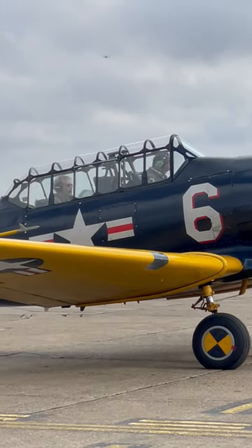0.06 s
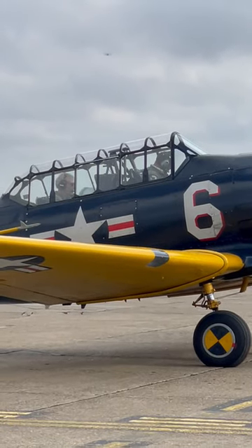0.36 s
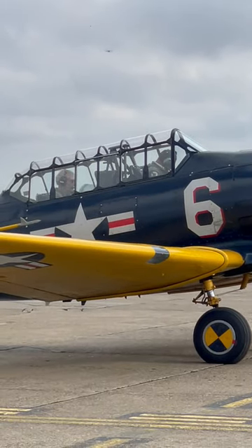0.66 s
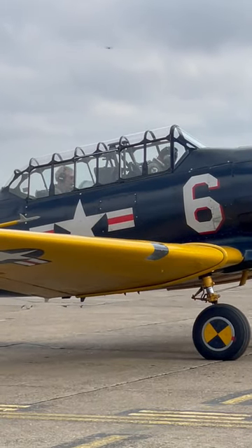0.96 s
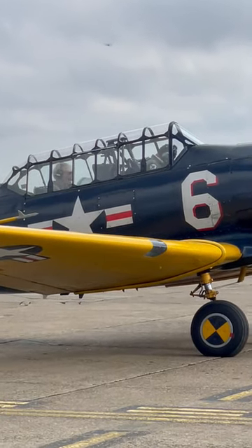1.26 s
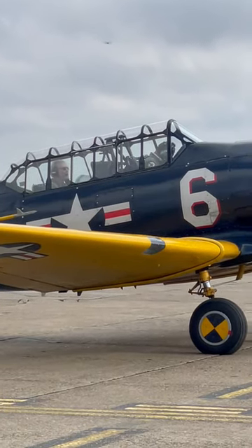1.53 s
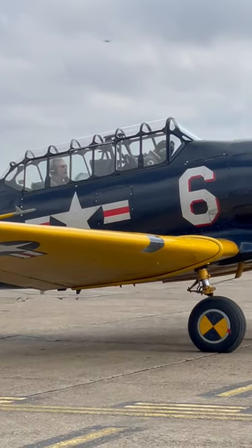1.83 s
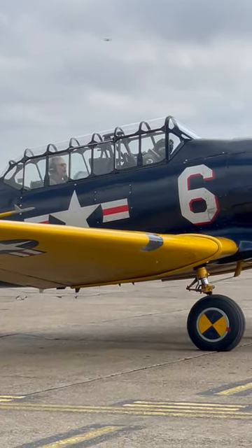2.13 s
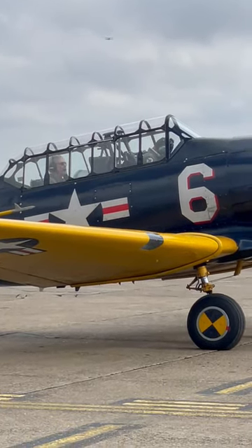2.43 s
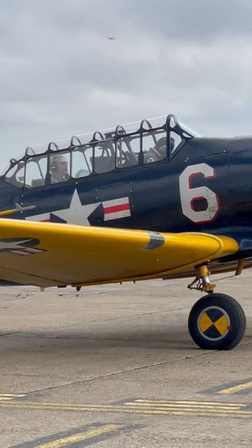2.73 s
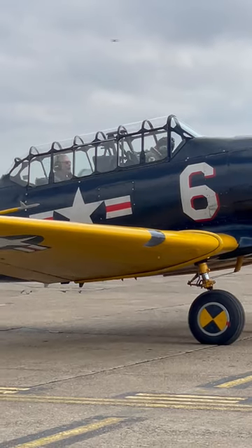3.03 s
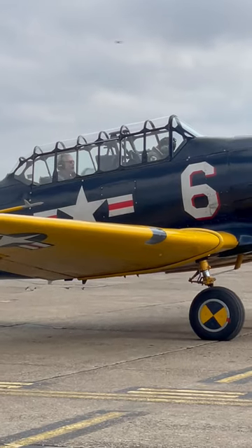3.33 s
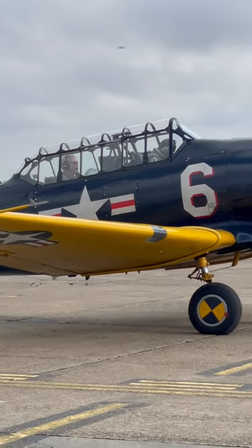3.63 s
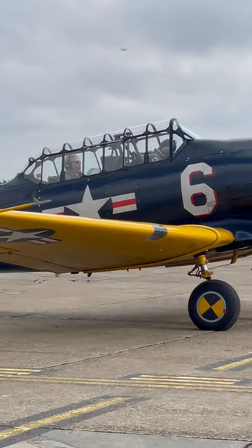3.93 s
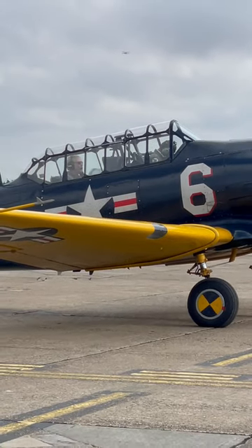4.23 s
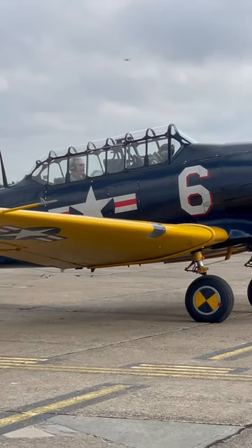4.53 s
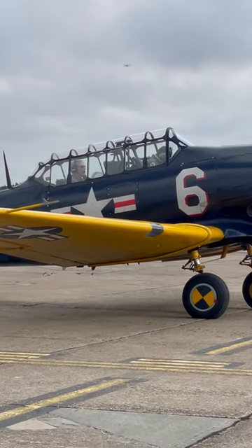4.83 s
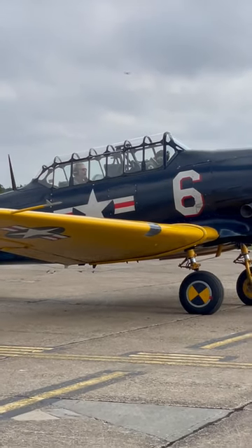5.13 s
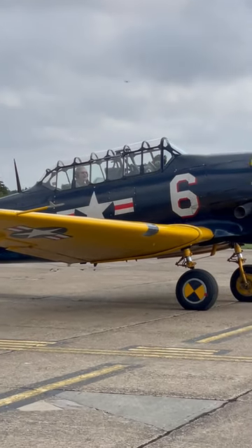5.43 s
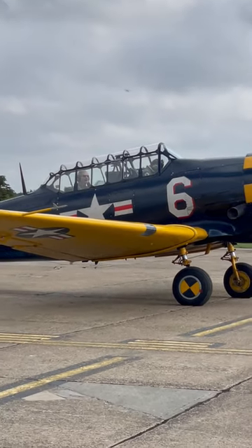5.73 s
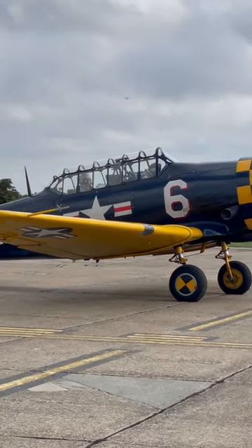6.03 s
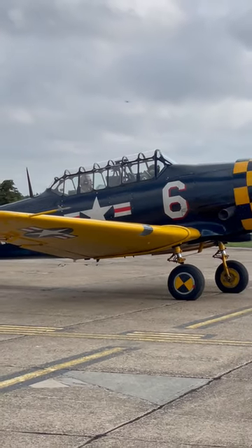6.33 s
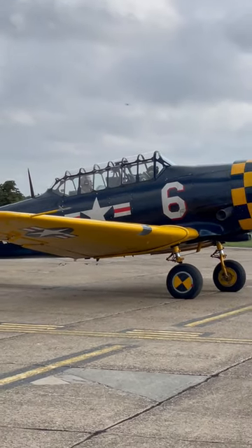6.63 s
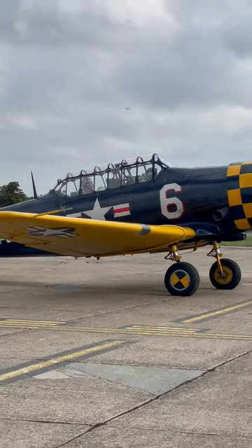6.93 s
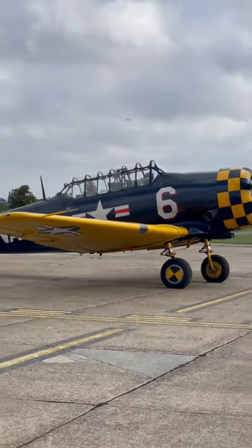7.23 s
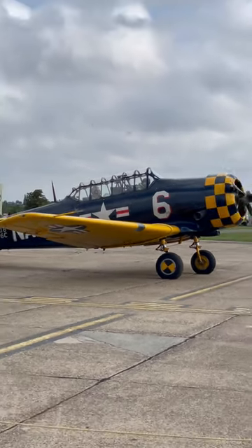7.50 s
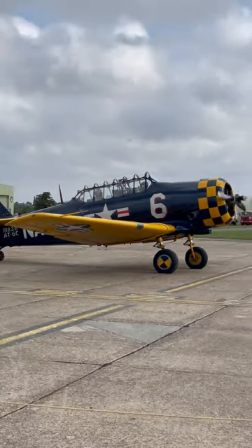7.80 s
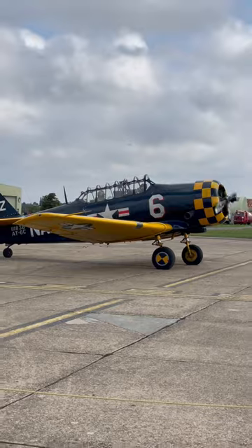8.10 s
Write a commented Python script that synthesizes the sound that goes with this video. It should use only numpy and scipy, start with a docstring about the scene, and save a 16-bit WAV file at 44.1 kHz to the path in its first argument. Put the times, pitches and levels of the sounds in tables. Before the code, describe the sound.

A propeller plane's radial piston engine idles close by on an open concrete apron. A deep, loping exhaust rumble pulses rapidly over a low hum, while the blades chop the air and valves tick and clack. Brief rasps from the propeller and a few hollow pops stand out, and the exhaust coughs around the middle. The sound grows slightly brighter as the microphone moves around the wing.

```python
"""A nine-cylinder radial aero engine idles on a concrete apron as the listener walks round the wing.
From the start, cylinders fire unevenly into one collector over a low hum, the two-blade propeller
chops the air and valves tick and clack; a bounce off the concrete combs blades and ticks.
From 1.4 s gusts rasp in the blades and hollow pops stand out; the exhaust coughs between 3 and 4 s.
The sound opens up until, at 5.5 s, the wing no longer shades it; a last gust and pop follow after 7 s."""
import sys
import numpy as np
from scipy import signal
from scipy.fft import rfft, irfft, next_fast_len
from scipy.io import wavfile
from scipy.ndimage import uniform_filter1d, map_coordinates

SR = 44100
rng = np.random.default_rng(int(sys.argv[2]) if len(sys.argv) > 2 else 0)


def pcm_store(signal):
    """Save signal as 16-bit PCM."""
    levels = np.round(np.clip(np.atleast_2d(signal), -1, 1) * 32767)
    wavfile.write(sys.argv[1], SR, levels.astype(np.int16).T)


N = 359856

# the drifting idle: t/s, firing rate/Hz
IDLE = [(0, 75.18), (.8, 75.33), (1.8, 75.07), (3.4, 75.56), (4.4, 75.28), (5.3, 75.51), (8.16, 75.73)]
# in firing order: exhaust lag/ms, relative pulse/dB, collector echo/ms, echo gain, relative tick/dB
CYLINDERS = [(2.89, 5, 2.54, .58, -5), (1.99, -.7, 3.58, 1, 5), (1.67, -.7, 3.47, .49, 4),
             (1.72, -2.9, 8.02, 1, -14), (.48, 1.9, 3.59, .69, -2), (1.22, 5.2, 3.36, .67, -.5),
             (2.54, 1.3, 3.69, 1, 4), (1.88, .7, 8.65, .81, -3), (.75, 1.2, 3.1, 1, -6)]
# bounce off the concrete: t/s, delay/ms
BOUNCE = [(0, 0.476), (4.1, 0.439), (6, 0.52), (8.16, 0.52)]
# colour of a valve tick: f/Hz, relative level/dB
TICK_COLOUR = [(700, -32), (1800, -33.5), (2600, -5), (4200, 0.5), (6300, -6), (8000, 3), (10500, -9.5),
               (15000, -6.5)]
BARK_DB, BARK_SHADE_DB = -14.5, 1.65  # exhaust bark in full view, and its loss behind the wing


def amp(db):
    """Decibels to gain."""
    return 10 ** (np.asarray(db) / 20)


def unit(x):
    """Scale to rms 1."""
    return x / np.sqrt(np.mean(x ** 2) + 1e-20)


def along(points, hz):
    """Interpolate (f/Hz, value) points on a log axis."""
    f, v = np.transpose(points)
    return np.interp(np.log(hz + 1), np.log(f + 1), v)


def curve(points):
    """Interpolate (t/s, value) points at every sample."""
    return np.interp(np.arange(N) / SR, *np.transpose(points))


def wobble(rate):
    """A smooth random curve, rate knots a second."""
    knots = rng.standard_normal(int(N * rate / SR) + 4)
    return map_coordinates(knots, [np.arange(N) * rate / SR])


def filtered(x, response):
    """Filter x by a complex function of frequency."""
    size = next_fast_len(N + SR // 2)
    return irfft(rfft(x, size) * response(np.fft.rfftfreq(size, 1 / SR)), size)[..., :N]


def coloured(x, spectrum, size=32768):
    """x through a minimum-phase filter with the given spectrum, at rms 1."""
    gain = amp(along(spectrum, np.fft.rfftfreq(size, 1 / SR)))
    cepstrum = irfft(np.log(gain))
    cepstrum[1:size // 2] *= 2
    cepstrum[size // 2 + 1:] = 0
    ring = irfft(np.exp(rfft(cepstrum)))[:size // 2]
    return unit(signal.fftconvolve(np.atleast_2d(x), ring[None], axes=1)[:, :N])


def noise(width):
    """Stereo white noise; width is side against mid."""
    mid, side = rng.standard_normal((2, N))
    return np.array([mid + width * side, mid - width * side])


def pulses(times, sizes):
    """Impulses placed between samples."""
    inside = (times > 0) & (times < (N - 2) / SR)
    at, part = np.divmod(times[inside] * SR, 1)
    at, sizes = at.astype(int), sizes[inside]
    return np.bincount(at, sizes * (1 - part), N) + np.bincount(at + 1, sizes * part, N)


def bursts(times, sizes, rise_ms, fall_ms):
    """An envelope that swells to a peak at each time and dies away."""
    ms = np.arange(-SR // 10, SR // 10) * 1000 / SR
    shape = np.exp(np.where(ms < 0, ms / rise_ms, -ms / fall_ms))
    return signal.fftconvolve(pulses(times, sizes), shape, "same")


def crank_times(slots, start_phase=.474):
    """When the crank reaches the given counts of firings; -1 outside the scene."""
    fired = np.cumsum(curve(IDLE)) / SR + start_phase
    return np.interp(slots, fired, np.arange(N) / SR, left=-1, right=-1)


def firings(count=630):
    """The time of every firing, and the columns of its cylinder."""
    slots = np.arange(count)
    return crank_times(slots), np.array(CYLINDERS)[slots % len(CYLINDERS)].T


def crank_tones(rows, waver_db, drift_rad):
    """Tones locked to the crank, from (periods per engine cycle, level/dB); each wavers on its own."""
    cycles = np.cumsum(curve(IDLE)) / SR / len(CYLINDERS)
    tones = np.zeros(N)
    for order, db in rows:
        gain = amp(db + waver_db * wobble(4.6))
        phase = 2 * np.pi * (round(order) * cycles + rng.random())
        tones += gain * np.sin(phase + drift_rad * wobble(5.1))
    return np.sqrt(2) * tones


def hidden(times, clear_s=5.5):
    """How much of the engine the wing still shades, 0-1."""
    return np.clip(1 - times / clear_s, 0, 1) ** 2


def in_view(level_db, shade_db):
    """Gain that rises by shade_db to level_db as a source comes out from behind the wing."""
    return amp(level_db - shade_db * hidden(np.arange(N) / SR))


def exhaust(scatter_db=.4, jitter_ms=.1, echo_scatter=.06, split_hz=103):
    """Each cylinder blows into the collector; part of the pulse runs round the ring and leaves late."""
    # resonances of the pipe: f/Hz, relative level/dB
    pipe_colour = [(8, -46), (28, -23.2), (45, -33.7), (62, -13.8), (78, .8), (100, -5.8), (122, -14),
                   (150, -.6), (185, -4.4), (225, -16.1), (270, -25.7), (350, -28.5), (460, -65),
                   (2500, -75.6)]
    times, (lag_ms, db, echo_ms, echo_gain, _) = firings()
    force, slip, echo_force, echo_slip = rng.standard_normal((len(times), 4)).T
    sizes = amp(db + scatter_db * force)
    direct = pulses(times + (lag_ms + jitter_ms * slip) / 1000, sizes)
    late_sizes = sizes * echo_gain * (1 + echo_scatter * echo_force)
    late = pulses(times + (lag_ms + echo_ms + jitter_ms * echo_slip) / 1000, late_sizes)
    pipe = coloured(direct + late, pipe_colour)
    # the boom spreads all round, while the bark grows as the outlet comes into view
    boom = filtered(pipe, lambda hz: 1 / (1 + (hz / split_hz) ** 10))
    bark = pipe - boom
    return in_view(-10, shade_db=.45) * unit(boom) + in_view(BARK_DB, BARK_SHADE_DB) * unit(bark)


def growl():
    """A few engine orders set the collector ringing."""
    # ringing orders: periods per engine cycle, level against the bark/dB
    orders = [(35, -28), (39, -22.5), (41, -29), (42, -26), (43, -28), (44, -33), (48, -27.5), (54, -34),
              (55, -36)]
    return in_view(BARK_DB, BARK_SHADE_DB) * crank_tones(orders, waver_db=1.6, drift_rad=.3)


def throbs(half_width_ms=11, count=70, size=6001):
    """Short low throbs at fixed points of each cycle make the engine lope."""
    # the throbs: place in the firing order, f/Hz, level/dB, loss behind the wing/dB
    lope = [(.26, 310, -24, 6), (2.68, 265, -20, 1), (4.16, 350, -25, 10), (4.28, 220, -25, 2),
            (4.66, 285, -21.5, 5), (8.52, 260, -19.5, 2)]
    t = (np.arange(size) - size // 2) / SR
    window = np.exp(-(1000 * t / half_width_ms) ** 2)
    out = np.zeros(N)
    for place, hz, db, shade_db in lope:
        times = crank_times(np.arange(count) * len(CYLINDERS) + place)
        level_db = db + rng.standard_normal(count) - shade_db * hidden(times)
        ring = window * np.cos(2 * np.pi * hz * t)
        out += signal.fftconvolve(pulses(times, amp(level_db)), ring, "same")
    return out


def hum(base_hz=24.45, drift_rad=.045):
    """A low hum wavers slightly and beats against the exhaust."""
    # hum partials: multiple of the base, level/dB
    partials = [(5, -30), (6, -38), (7, -37.5), (9, -38)]
    phase = 2 * np.pi * base_hz * np.arange(N) / SR + drift_rad * wobble(2.4)
    return np.sqrt(2) * sum(amp(db) * np.sin(multiple * phase + 2 * np.pi * rng.random())
                            for multiple, db in partials)


def slipstream(swell_db=1.2):
    """The air behind the propeller rumbles in slow swells."""
    # colour of the rumble: f/Hz, relative level/dB
    rumble_colour = [(8, -19), (40, -6), (100, -7.5), (250, 1), (350, -2.5), (450, -11), (800, -43)]
    swell = amp(swell_db * wobble(5))
    return in_view(-28, shade_db=1.6) * swell * coloured(noise(.24), rumble_colour)


def scattered(x, fall_ms, size=2600):
    """A short flurry of reflections delays the frequencies differently but passes them all alike."""
    ms = np.arange(size) * 1000 / SR
    flurry = rng.standard_normal(size) * np.exp(-ms / fall_ms)
    all_pass = irfft(np.exp(1j * np.angle(rfft(flurry))))
    return signal.fftconvolve(x, all_pass)[:N]


def propeller(offset=.1, wander_s=.00013, slap_width=.14, swish_lag_s=.0017, chop_floor=1.6, count=280):
    """Blades pass four times in nine firings; each slaps the air, drags a swish and rasps in a gust."""
    # colours of the blade's slap, swish and rasp: f/Hz, relative level/dB
    slap_colour = [(10, -54), (40, -29.5), (130, -19.5), (330, -1), (420, 0.5), (500, -5), (640, 2.5),
                   (900, 1), (1500, -11.5), (3000, -37)]
    swish_colour = [(100, -20), (350, 5.5), (650, 5), (1000, 0), (1450, 4), (1950, -5), (2300, -2),
                    (2700, -2.5), (3200, -6), (5000, -14), (9000, -17.5), (15000, -23)]
    rasp_colour = [(200, -17), (550, 10.5), (900, 2.5), (1500, 6), (2000, -2), (2900, -1), (4500, -6.5),
                   (9000, -37.5)]
    times = crank_times(np.arange(count) * len(CYLINDERS) / 4 + offset)
    slip, slap_force, swish_force = rng.standard_normal((count, 3)).T
    # eddies make the slaps wander a little in time and strength
    wander = wander_s * unit(uniform_filter1d(slip, 3))
    blades = pulses(times + wander, amp(1.5 * slap_force))
    # cowling, wing and ground smear each slap, a little differently left and right
    mid = scattered(blades, fall_ms=25.7)
    side = slap_width * np.outer([1, -1], scattered(blades, fall_ms=47))
    slap = coloured(mid + side, slap_colour) * amp(.6 * wobble(18))
    chop = chop_floor + bursts(times + swish_lag_s, amp(2 * swish_force), rise_ms=6.8, fall_ms=4.1)
    swish = coloured(chop * noise(.04), swish_colour) * amp(1.1 * wobble(22))
    rasp = coloured(chop * noise(.1), rasp_colour)
    return in_view(-35, shade_db=5.1) * slap + in_view(-29, shade_db=3.65) * swish + gusts() * rasp


def drone(width=.45):
    """The blades, passing four times a cycle, sing a stack of clean tones."""
    # swells of the drone: t/s, level/dB
    swells = [(0, -48), (1, -47.5), (1.4, -44), (3.5, -43.5), (3.9, -47), (4.45, -42.5), (5, -48),
              (6, -48.5), (7, -44), (7.6, -51.5), (8.16, -50)]
    # its tones: multiple of the blade rate, relative level/dB
    harmonics = [(13, -1), (14, -1), (15, -6), (16, -7), (17, -3), (18, -3), (19, -3), (20, -3), (21, -10),
                 (23, -6), (25, -4)]
    orders = [(4 * multiple, db) for multiple, db in harmonics]
    direct, reflected = (crank_tones(orders, waver_db=2, drift_rad=.65) for _ in range(2))
    return amp(curve(swells)) * (direct + width * np.outer([1, -1], reflected))


def clinks(times, db, hz, rise_ms, fall_ms, size=900):
    """Brief rings of steel, each peaking at its time."""
    offsets = np.arange(size) - size // 3
    t = offsets / SR
    shape = np.exp(np.where(t < 0, t / rise_ms, -t / fall_ms) * 1000)
    phase = 2 * np.pi * (hz[:, None] * t + rng.random((len(times), 1)))
    rings = amp(db)[:, None] * shape * np.sin(phase)
    at = np.round(times * SR).astype(int)[:, None] + offsets
    inside = (at >= 0) & (at < N)
    return np.bincount(at[inside], rings[inside], N)


def valves(scatter_db=2.5, jitter_ms=.66, ring_scatter_db=2, detune=.04):
    """Each valve ticks once a cycle and rings its gear, over the hiss of gas and cooling air."""
    # modes of the valve gear: f/Hz, relative level/dB
    rocker_modes = [(2600, -5), (4200, 2), (5950, 4.5), (6450, 0), (7750, -1)]
    # colour of the hiss: f/Hz, relative level/dB
    hiss_colour = [(800, -21), (3000, 7), (4200, 7), (6000, 5.5), (8000, 3), (11000, -16), (15500, 2.5)]
    times, (*_, tick_db) = firings()
    slip, force = rng.standard_normal((len(times), 2)).T
    times = times + jitter_ms * slip / 1000
    tick_db = tick_db + scatter_db * force
    taps = bursts(times, amp(tick_db), rise_ms=1.7, fall_ms=2.6)
    ticks = coloured(taps * noise(.15), TICK_COLOUR)
    ring = np.zeros(N)
    for hz, db in rocker_modes:
        # no two blows ring the gear alike
        strength, pitch = rng.standard_normal((2, len(times)))
        ring_db = tick_db + db + ring_scatter_db * strength
        ring += clinks(times, ring_db, hz * (1 + detune * pitch), rise_ms=.9, fall_ms=1.6)
    hiss = coloured(noise(.22), hiss_colour)
    return in_view(-31.5, shade_db=5) * (amp(-9) * ticks + amp(-11) * unit(ring) + amp(-6) * hiss)


def off_concrete(x, strength=.17):
    """The direct sound plus its bounce off the apron, whose delay changes as the listener walks."""
    late = np.arange(N) - curve(BOUNCE) * SR / 1000
    return x + strength * np.array([map_coordinates(side, [late]) for side in x])


def comb_hz(times):
    """The spacing of the frequencies that the concrete reinforces at these moments."""
    return 1000 / np.interp(times, *np.transpose(BOUNCE))


def slack_landings(scatter_db=1.6, detune=.02, shade_db=3, ping_teeth=2.96, count=70):
    """Valves with too much play land once a cycle, never quite alike; gives rows for clacks()."""
    # slack valves: place in the firing order, knock/dB, clank/dB, ping/dB
    slack_valves = [(1, -41, -43.5, -25.5), (2, -31.5, -30.5, -32), (6, -26.5, -26, -41.5)]
    rows = []
    for place, *modes_db in slack_valves:
        times = crank_times(np.arange(count) * len(CYLINDERS) + round(place))
        chance = rng.standard_normal((count, 4))
        db = modes_db + scatter_db * chance[:, :3] - shade_db * hidden(times)[:, None]
        ping_hz = ping_teeth * comb_hz(times) * (1 + detune * chance[:, 3])
        rows.append(np.column_stack([times, db, ping_hz]))
    return np.vstack(rows)


def clacks(knock_hz=2574, clank_teeth=1.97, detune=.025, crack_trim_db=-3.5, min_gap_s=.005):
    """Slack valves land hard: a crack, the rocker's knock, a clank and a bright ping."""
    # the loudest landings: t/s, knock/dB, clank/dB, ping/dB, ping f/Hz
    loud = [(.071, -22, -23.5, -25.5, 6300), (0.311, -24, -18, -20.5, 6650), (0.789, -26, -21.5, -27, 6000),
            (1.028, -35, -18.5, -41, 6200), (1.267, -21.5, -20, -31, 6150), (1.387, -25, -23, -26, 6400),
            (1.507, -27, -22, -40, 6100), (1.748, -27, -34, -25, 6300), (1.814, -19, -33, -22.5, 6370),
            (1.868, -21, -25, -28, 6200), (2.173, -20, -28, -23, 6230), (2.23, -30, -20.5, -25, 5900),
            (2.587, -24, -29, -27, 6400), (2.653, -18.5, -23, -25, 6440), (2.706, -26, -24, -22, 6070),
            (3.130, -20, -38, -21.5, 6440), (3.181, -21, -28, -19.5, 6400), (3.3, -22, -21, -44, 6200),
            (3.421, -15, -16.5, -25, 6300), (3.476, -40, -18, -22, 6440), (3.486, -18.5, -24, -20, 6400),
            (3.553, -25, -28, -31.5, 6400), (3.608, -19, -26, -26.5, 6400), (3.659, -21, -29, -28, 6430),
            (3.778, -20.5, -29, -30, 6500), (3.964, -32, -33, -16, 7000), (4.017, -20, -22, -29, 5750),
            (4.071, -36, -30, -22, 6550), (4.310, -34, -27, -18, 6400), (4.495, -22, -28, -28, 6400),
            (4.561, -25, -35, -21, 6540), (4.613, -22, -30.5, -28, 6260), (4.628, -22, -33, -33.5, 6400),
            (4.667, -27, -42, -27.5, 6400), (4.681, -17, -33, -34, 6200), (4.918, -19.5, -29, -26, 6200),
            (4.973, -22, -27.5, -30, 6100), (5.025, -30, -38, -19, 6100), (5.276, -28, -33, -21, 5800),
            (5.449, -19, -20, -34, 5450), (5.503, -36, -38, -19.5, 5800), (5.516, -23, -41, -14.5, 7860),
            (6.044, -19, -28, -18, 7400), (6.164, -25, -31, -28.5, 5900), (6.229, -29, -33, -22.5, 5970),
            (6.284, -34, -22, -22, 5800), (6.404, -25, -25, -25, 5900), (6.640, -24, -19.5, -19.5, 6200),
            (7.051, -33, -32, -21.5, 5900), (7.711, -34, -18.5, -17, 7640), (7.947, -36, -21.5, -43, 5750),
            (8.121, -37, -25, -18, 5800), (8.132, -25, -31, -14, 6100)]
    usual = slack_landings()
    # a loud landing takes the place of the usual one
    free = np.abs(usual[:, :1] - np.array(loud)[:, 0]).min(axis=1) > min_gap_s
    times, knock_db, clank_db, ping_db, ping_hz = np.vstack([loud, usual[free]]).T
    # the higher modes ring loudest near the comb's teeth, where the bounce adds in phase
    clank_hz = clank_teeth * comb_hz(times) * (1 + detune * rng.standard_normal(len(times)))
    crack_db = np.maximum(clank_db, ping_db) + crack_trim_db
    crack = bursts(times, amp(crack_db), rise_ms=1, fall_ms=2.2) * coloured(noise(.25), TICK_COLOUR)
    knock = clinks(times, knock_db, np.full(len(times), knock_hz), rise_ms=.37, fall_ms=1.46)
    clank = clinks(times, clank_db, clank_hz, rise_ms=.6, fall_ms=1.6)
    ping = clinks(times, ping_db, ping_hz, rise_ms=.42, fall_ms=1.6)
    return crack + knock + clank + ping


def gusts(rise_s=.0046, fall_s=.04):
    """Envelope of the blades' rasp: each gust rises quickly, holds and dies away."""
    # gusts that the propeller bites into: t/s, length/s, level/dB
    cues = [(1.381, 0.17, -31.5), (3.235, 0.078, -27), (3.875, 0.031, -33), (4.451, 0.28, -34),
            (4.931, .13, -35.5), (7.1, 0.38, -39)]
    t = np.arange(N) / SR
    envelope = np.zeros(N)
    for start, length, db in cues:
        attack = np.clip((t - start) / rise_s, 0, 1)
        release = np.exp(-np.maximum(t - start - length, 0) / fall_s)
        envelope += amp(db) * attack * release
    return envelope


def pops(rise_ms=2.5, fall_ms=14, trim_db=-2.5):
    """Now and then a short, hollow pop stands out over the engine."""
    # the pops: t/s, level before trim/dB, pitch ratio
    cues = [(1.563, -19, 1), (2.276, -14.5, .95), (2.510, -19.5, 1.27), (3.315, -18, 1), (3.848, -16, 1.1),
            (7.42, -19.5, 1.05)]
    # colour of the usual pop: f/Hz, relative level/dB
    pop_colour = [(30, -35), (200, -9.5), (400, 10), (620, 17.5), (900, -12), (2000, -16), (3200, -16),
                  (6000, -36)]
    out = np.zeros((2, N))
    for peak_s, db, pitch in cues:
        envelope = bursts(np.array([peak_s]), amp([db + trim_db]), rise_ms, fall_ms)
        out += envelope * coloured(noise(.13), np.array(pop_colour) * [pitch, 1])
    return out


def coughs(rise_ms=.7, fall_ms=4.5):
    """A charge that lights at the outlet coughs, short and bright."""
    # coughs of the exhaust: t/s, level/dB
    cues = [(3.254, -24.5), (3.284, -26), (3.850, -18.5), (3.859, -22), (3.880, -26.5)]
    # colour of a cough: f/Hz, relative level/dB
    cough_colour = [(300, -27), (800, 2), (1400, -5.5), (2000, -0.5), (3100, 0.5), (3800, -11.5),
                    (8000, -34)]
    times, db = np.transpose(cues)
    return bursts(times, amp(db), rise_ms, fall_ms) * coloured(noise(.15), cough_colour)


def scene():
    """The engine, its propeller and the air they stir."""
    return (exhaust() + growl() + throbs() + pops() + coughs() + drone() + hum() + slipstream()
            + clacks() + off_concrete(propeller() + valves()))


def record(dry, ceiling=.95, top_hz=15900):
    """Two microphone ports differ in phase and level; peaks are rounded off and the band is limited."""
    # phase between the ports: f/Hz, left lead/rad
    port_phase = [(300, 0), (520, -.4), (700, 0), (2400, 0), (3400, .1), (4400, .6), (4850, 1.5), (5200, 0),
                  (6500, 1), (8000, 2.1), (9200, 3.05), (10000, 3.14), (11200, 3.25), (12800, 4.7),
                  (14400, 6.28)]
    # balance of the ports: f/Hz, left minus right/dB
    port_balance = [(330, 0), (500, -3.9), (1100, -4.5), (1450, 0)]

    def ports(hz):
        """Complex response, left and right."""
        lead = np.array([np.exp(1j * along(port_phase, hz)), np.ones_like(hz)])
        return lead * amp(along(port_balance, hz) * [[.5], [-.5]])

    heard = filtered(dry, ports)
    rounded = heard / (1 + np.abs(heard / ceiling) ** 10) ** (1 / 10)
    return filtered(rounded, lambda hz: hz < top_hz)


dry = scene()
out = record(dry)
pcm_store(out)
```